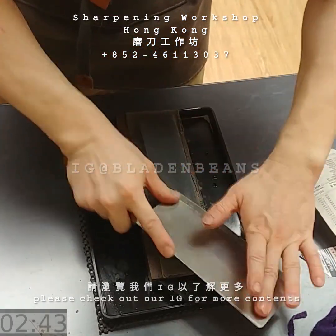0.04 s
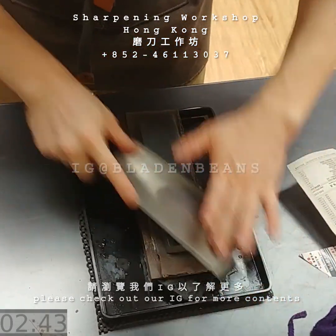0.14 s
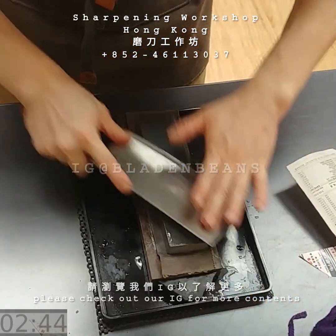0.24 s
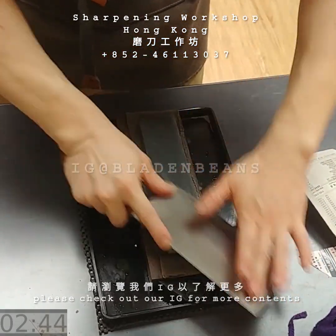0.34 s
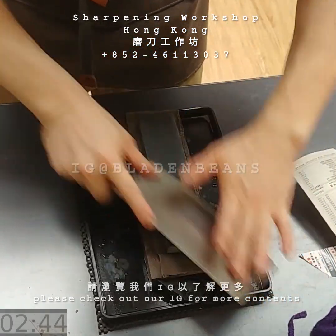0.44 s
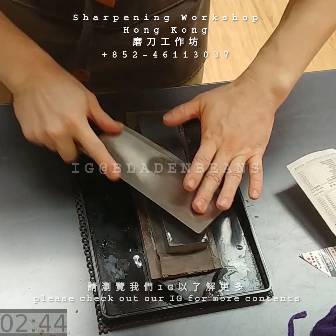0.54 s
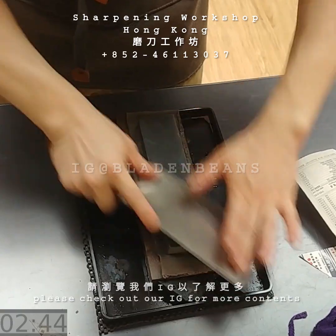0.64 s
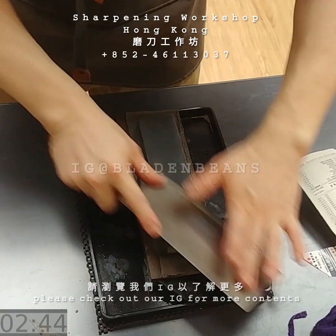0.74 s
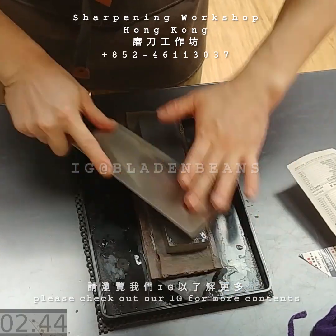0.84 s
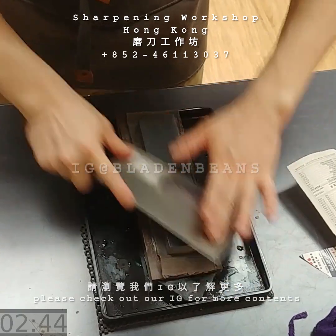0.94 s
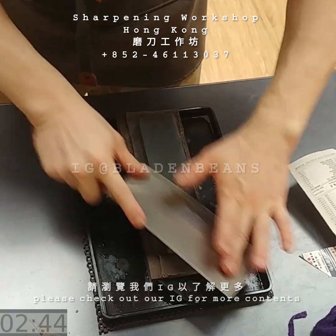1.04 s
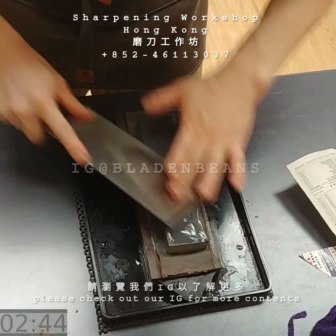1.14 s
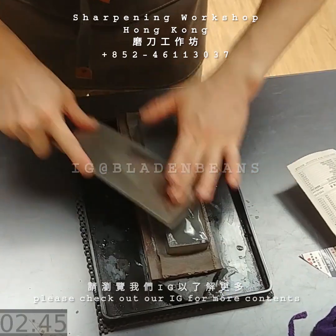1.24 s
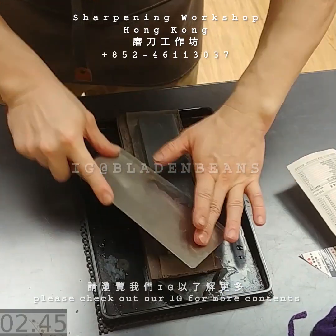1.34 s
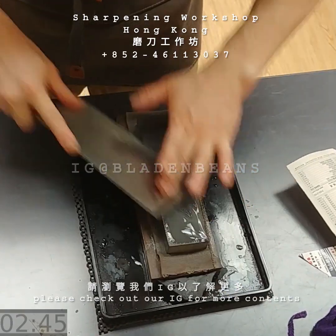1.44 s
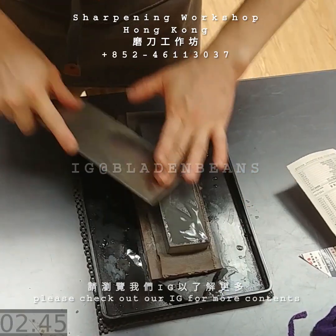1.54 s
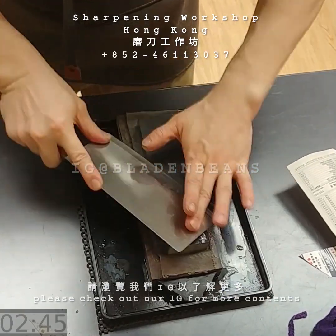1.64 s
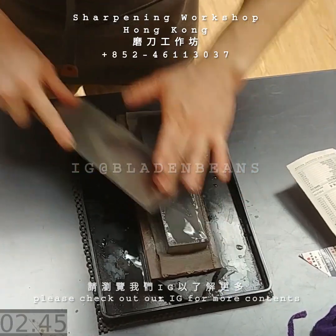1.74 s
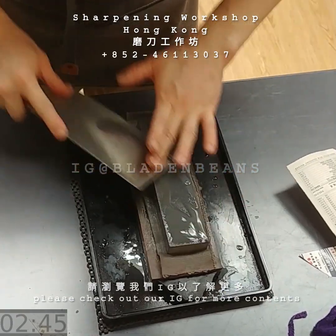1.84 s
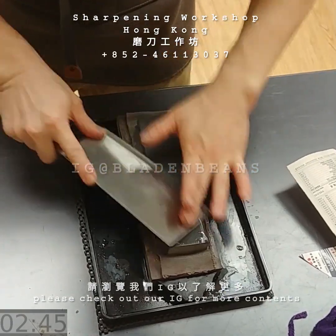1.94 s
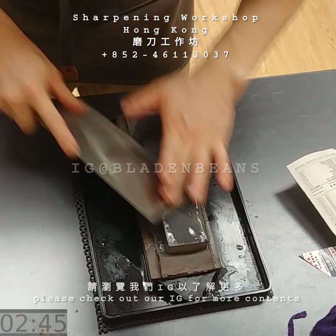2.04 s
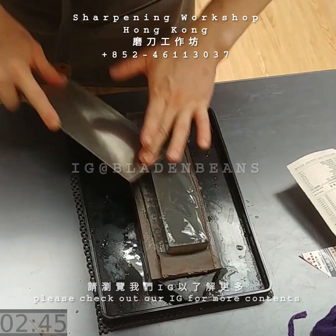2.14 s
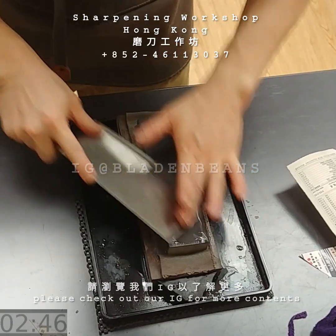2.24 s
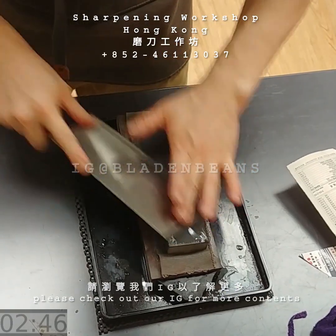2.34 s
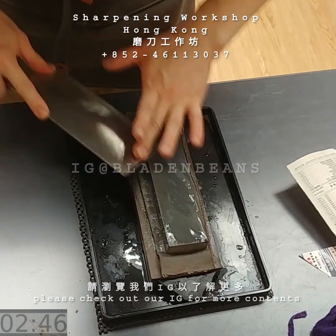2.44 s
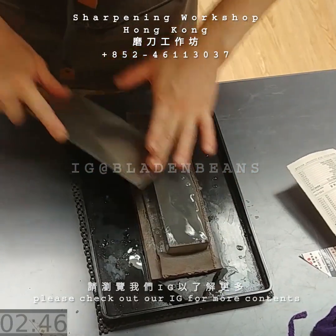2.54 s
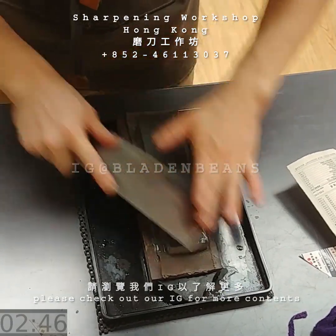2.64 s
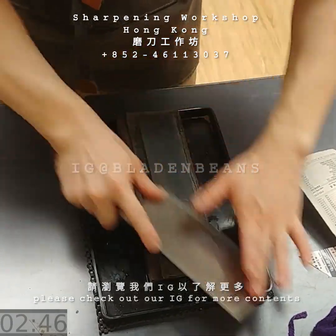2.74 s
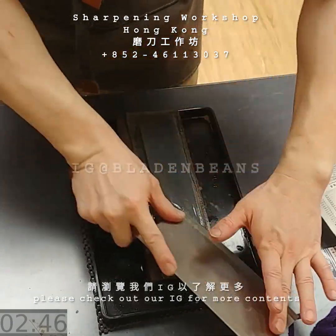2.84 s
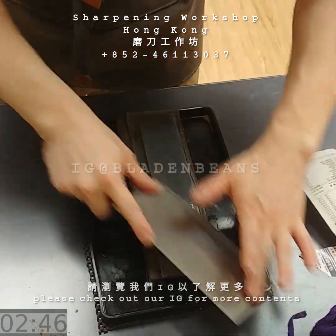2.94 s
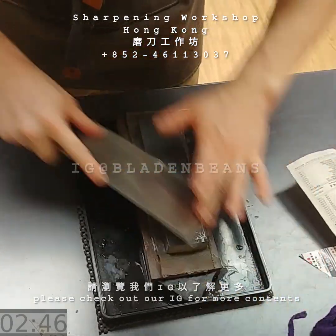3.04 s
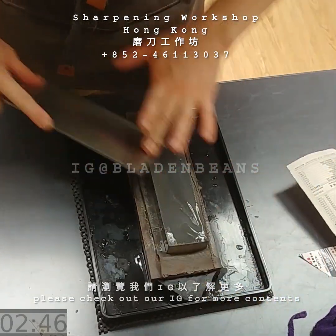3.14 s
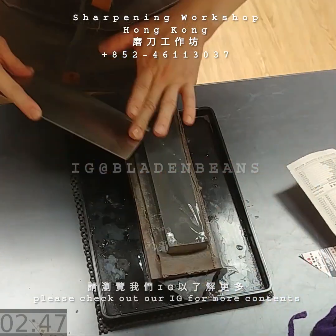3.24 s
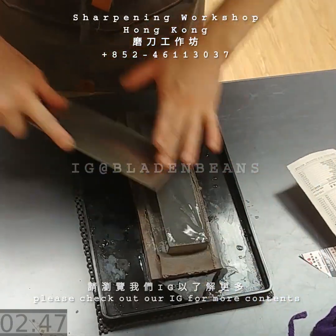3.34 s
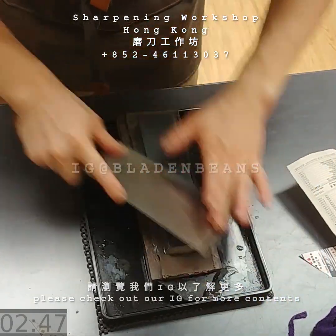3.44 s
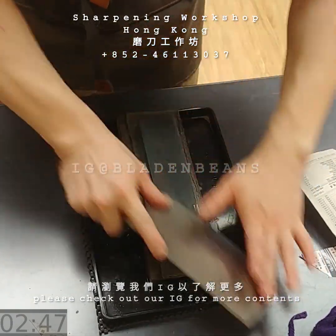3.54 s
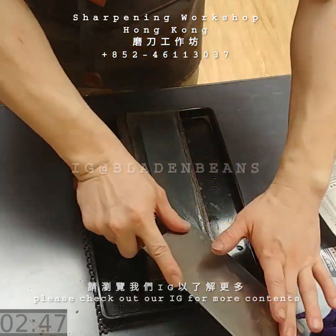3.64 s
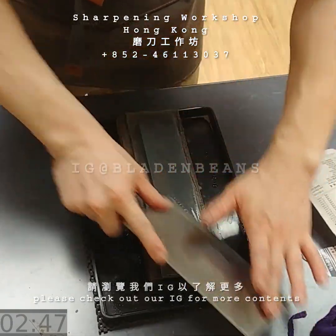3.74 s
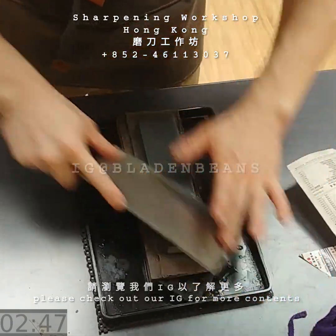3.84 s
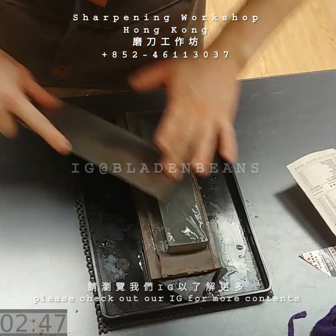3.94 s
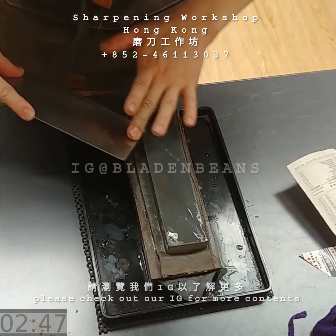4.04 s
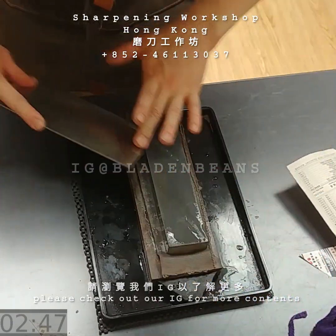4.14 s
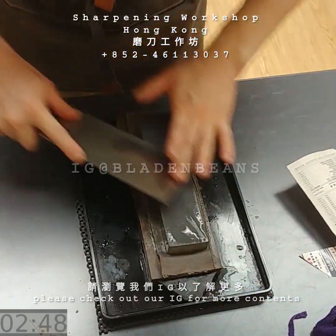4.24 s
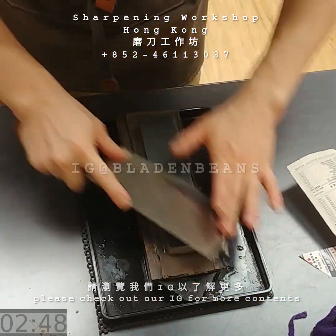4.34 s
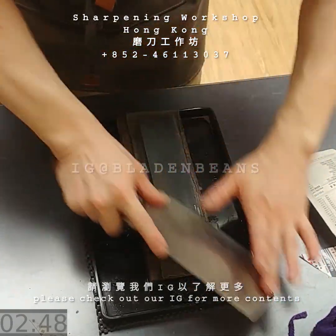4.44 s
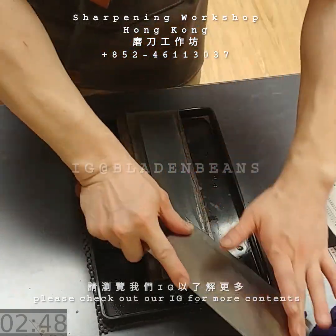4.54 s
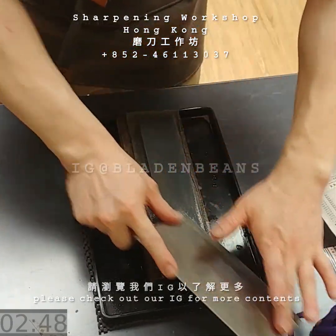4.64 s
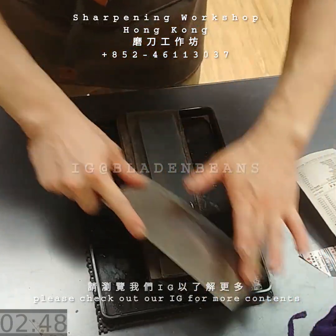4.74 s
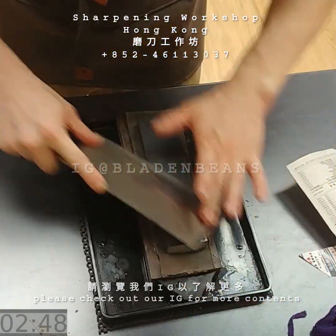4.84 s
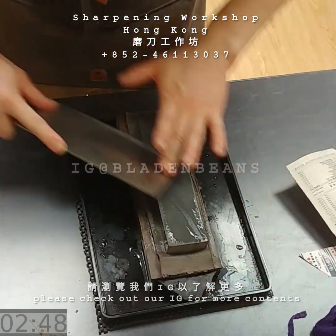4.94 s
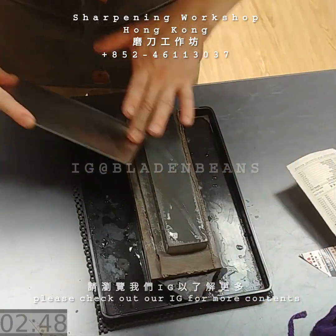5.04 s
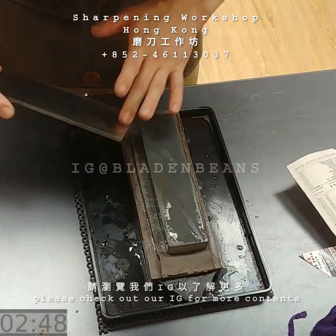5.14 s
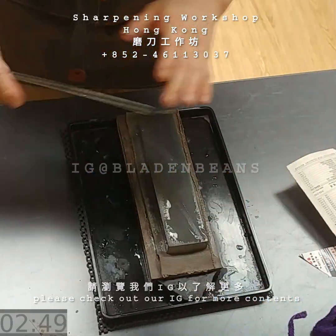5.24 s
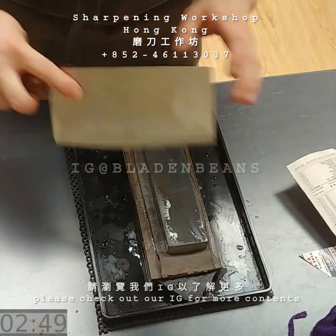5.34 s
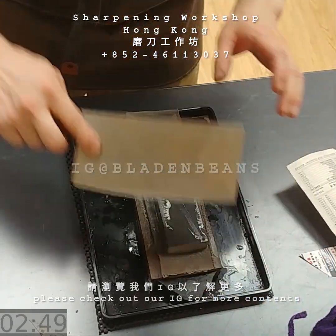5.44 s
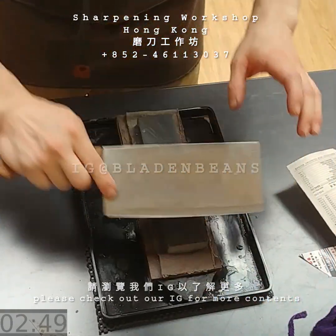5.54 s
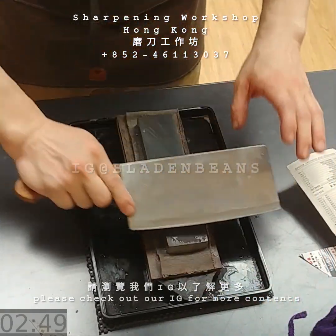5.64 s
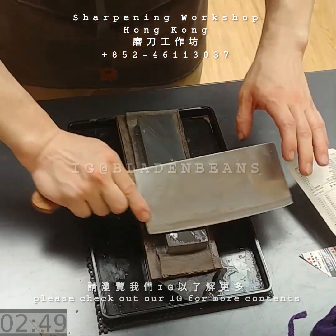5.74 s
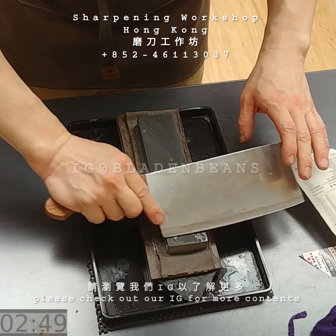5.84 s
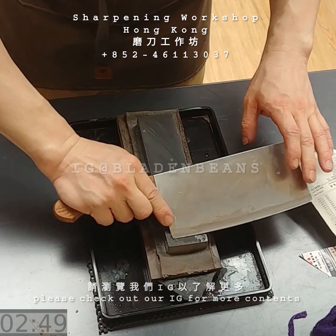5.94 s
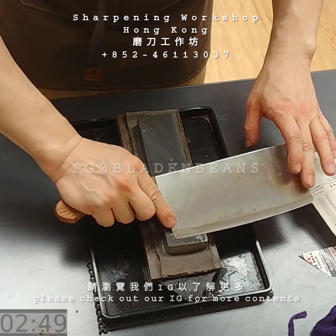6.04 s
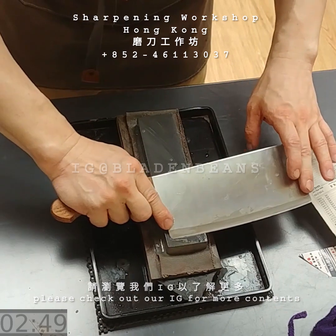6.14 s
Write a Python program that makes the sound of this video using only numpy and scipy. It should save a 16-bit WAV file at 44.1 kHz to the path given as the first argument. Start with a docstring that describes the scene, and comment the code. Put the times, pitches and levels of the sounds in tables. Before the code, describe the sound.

Close to a wet whetstone in a small workshop, a steel cleaver is ground in rapid, uneven strokes, bright and hissy with a slight tray rattle. The strokes grow longer and slower, some ending in a brief metallic ring. The blade lifts off, leaving only a low ventilation rumble, then touches the stone again very faintly. The stereo image leans left.

```python
"""Cleaver on a whetstone

A steel cleaver is ground back and forth on a wet whetstone in a small workshop: fast strokes, then longer ones.
Random scratches of grit, filtered by resonances, hiss along the edge and ring blade, stone and tray.
Narrow noise bands slide down over long pushes, and the blade sings briefly where it overhangs the stone.
The blade lifts off, is silent for a moment and is set down again for two faint strokes.
A ventilation fan of coloured noise and a few unsteady tones rumbles throughout."""
import sys
import numpy as np
from scipy import signal
from scipy.fft import rfft, irfft, next_fast_len
from scipy.io import wavfile
from scipy.ndimage import uniform_filter1d, map_coordinates

SR = 44100
rng = np.random.default_rng(int(sys.argv[2]) if len(sys.argv) > 2 else 0)


def inscribe(sig):
    """Save sig as 16-bit PCM at rate SR to the path in sys.argv[1].

    A 1-D sig is mono; a 2-D sig holds one channel per row.
    Samples are clipped to [-1, 1] before scaling.
    """
    pcm = np.round(np.clip(np.atleast_2d(sig).T, -1, 1) * 32767)
    wavfile.write(sys.argv[1], SR, pcm.astype(np.int16))


N = 273420

# spectrum of fine grit on steel: (frequency [Hz], relative density [dB])
HISS_SPECTRUM = [(2000, -30.5), (5200, -5.5), (6000, 2), (6900, -5), (7900, 0), (9400, -0.5), (10400, -15),
                 (11500, -12), (15500, -8)]


def amp(db):
    """Level to amplitude: 20 dB is a factor of ten."""
    return 10 ** (np.asarray(db) / 20)


def unit(x):
    """Normalisation to rms 1, so that a later gain sets the level."""
    return x / np.sqrt(np.mean(x ** 2) + 1e-20)


def clock():
    """The time of each sample [s]."""
    return np.arange(N) / SR


def along(points, hz):
    """Linear interpolation of (frequency [Hz], value) points on a logarithmic frequency axis."""
    f, value = np.transpose(points)
    return np.interp(np.log(hz + 1), np.log(f + 1), value)


def wobble(rate):
    """Band-limited random motion: a smooth curve through random knots, rate of them a second."""
    knots = rng.standard_normal(int(N * rate / SR) + 4)
    return map_coordinates(knots, [np.arange(N) * rate / SR])


def filtered(x, response):
    """Linear filtering: the spectrum of x times a response given as a function of frequency [Hz]."""
    m = next_fast_len(N + SR // 2)
    hz = np.fft.rfftfreq(m, 1 / SR)
    return irfft(rfft(x, m) * response(hz), m)[..., :N]


def coloured(x, spectrum):
    """Spectral shaping of x by (frequency [Hz], level [dB]) points, at rms 1."""
    return unit(filtered(x, lambda hz: amp(along(spectrum, hz))))


def rung(x, modes):
    """Modal superposition: x drives parallel damped resonators (Hz, width Hz, dB), at rms 1."""
    def response(f):
        return sum(amp(db) * 1j * f * width / (centre * centre - f * f + 1j * f * width)
                   for centre, width, db in modes)
    return unit(filtered(x, response))


def fan():
    """Broadband flow noise, partly coherent between the ears, with tones of wandering phase."""
    # rumble spectrum: (frequency [Hz], relative density [dB])
    air_spectrum = [(25, -47), (50, -13.5), (80, -2), (125, -9.5), (180, -4.5), (220, -13), (290, -12.5),
                    (490, -18), (800, -25), (1500, -35), (3100, -45), (6000, -53.5), (8500, -69),
                    (15000, -56)]
    # fan tones: (frequency [Hz], rms level [dB])
    tones = [(79, -40), (101, -43), (172.4, -47)]
    # correlation of left and right: (frequency [Hz], correlation [-1 to 1])
    alike = [(100, 0.99), (300, 0.99), (1200, 0.29)]

    def mid_and_side(hz):
        # half the angle whose cosine is the correlation
        angle = np.arccos(np.clip(along(alike, hz), -1, 1)) / 2
        return np.array([np.cos(angle), np.sin(angle)])

    air = filtered(rng.standard_normal((2, N)), mid_and_side)
    mid, side = coloured(air, air_spectrum)
    hum = sum(amp(db) * unit(np.sin(2 * np.pi * hz * clock() + 0.8 * wobble(6))) for hz, db in tones)
    return amp(-38.0) * unit(np.array([mid + side, mid - side])) + hum


BRAKE_S, TURN_DB = 0.038, 9  # the blade brakes this long before a reversal and the hiss drops this far
LIFT_S, LIFT_DB = .28, -40.5  # before lifting the hands ease off this long, down to this hiss gain
BITE_GROWS = 1.3  # dB of bite for each dB of hiss
TREMOR_DB, TREMOR_RATE = 1, 35  # unsteadiness of the hands: depth, and random knots a second
SKID_S = 0.016  # half length of a skid
PEEL_S = 0.12  # the edge peels off over this time, until it has left the stone
LEAVE_S, SET_DOWN_S = 5.22, 5.98  # the edge has left the stone, and touches it again


def effort():
    """Friction follows speed and pressure: hiss and bite gains rise, sag and brake; zero without contact."""
    # strokes from one reversal to the next: (start [s], rise [s], hiss gain at full speed [dB],
    # sag over the stroke, negative for a swell [dB], bite gain relative to hiss at full speed [dB])
    strokes = [(-.05, .05, -17.5, 3, -7.5), (0.079, 0.013, -21.5, -2, -6.5), (.21, 0.054, -16, 5, -6.5),
               (0.404, 0.048, -20, -3.5, -7), (0.48, 0.041, -22, -4.5, -3), (.568, 0.042, -16.5, 2, -6),
               (.735, 0.02, -18.5, 0.5, -6.5), (.895, 0.012, -17.5, -1, -7), (1.046, 0.03, -21, -3.5, -7.5),
               (1.222, 0.029, -15.5, 9, -4.5), (1.522, 0.056, -17.5, -0.5, -5), (1.687, 0.028, -19, 0, -14),
               (1.842, .04, -19, -3.5, -3.5), (1.999, 0.037, -16, 7, -9), (2.161, 0.051, -13.5, 10, -6.5),
               (2.503, 0.1, -12.5, 9, -4.5), (2.872, 0.067, -16, 11, -7), (3.25, 0.16, -15, 8, -5),
               (3.674, 0.071, -16, 15.5, -6), (4.105, .16, -17, 7.5, -5.5), (4.601, 0.069, -16, 1.5, -9),
               (5.974, 0.012, -40.5, 2.5, -3), (6.055, 0.058, -33.5, -6, -3)]
    # the edge skids on the slurry and loses its grip for a moment: (middle [s], dip [dB])
    skids = [(1.38, 5.5), (2.222, 6.5), (2.32, 4), (2.61, 9), (3.015, 0.5), (4.803, 2.8)]
    t = clock()
    hiss_db, bite_db = np.zeros((2, N))
    ends = [row[0] for row in strokes[1:]] + [t[-1] + 2 * BRAKE_S]
    turn_db = strokes[0][2] - TURN_DB
    for (start, rise, db, sag_db, press_db), end in zip(strokes, ends):
        brake, end_db = BRAKE_S, db - sag_db - TURN_DB
        if start < LEAVE_S < end:
            end, brake, end_db = LEAVE_S, LIFT_S, LIFT_DB
        now = t >= start  # the next stroke overwrites what follows its own start
        corners = np.maximum.accumulate([start, start + rise, end - brake, end])
        hiss_db[now] = np.interp(t[now], corners, [turn_db, db, db - sag_db, end_db])
        bite_db[now] = db + press_db + BITE_GROWS * (hiss_db[now] - db)
        turn_db = end_db
    tremor_db = TREMOR_DB * wobble(TREMOR_RATE)
    skid_db = sum(db * np.exp(-((t - s) / SKID_S) ** 2) for s, db in skids)
    grip_db = tremor_db - skid_db
    touching = np.clip((LEAVE_S - t) / PEEL_S, 0, 1) ** 2 + (t >= SET_DOWN_S)
    return touching * amp(hiss_db + grip_db), touching * amp(bite_db + grip_db)


def grit(rate, spread_db, judder_db):
    """Shot noise: tiny random scratches, rate a second, clumped by the judder of the edge."""
    hit = rng.random(N) < rate / SR
    sizes = rng.standard_normal(N) * amp(spread_db * rng.standard_normal(N))
    judder = amp(judder_db * (wobble(260) + wobble(60)) / 2)
    return unit(hit * sizes * judder)


def shifting(x, patchy_db):
    """Time-varying coupling: the contact moves along the edge and favours ever different frequencies."""
    z = signal.stft(x, nperseg=512)[2]
    field = uniform_filter1d(rng.standard_normal(z.shape), size=6, axis=0)
    field = uniform_filter1d(field, size=8, axis=1)
    patchy = z * amp(patchy_db * unit(field))
    return unit(signal.istft(patchy, nperseg=512)[1][:N])


def grinding(hiss, bite):
    """Contact excitation: fine grit hisses and rings high modes; pressed coarse grit drives lower ones."""
    # spectrum of coarse grit: (frequency [Hz], relative density [dB])
    bite_spectrum = [(1000, -38.5), (1700, -19.5), (2400, -11), (3200, -3.5), (4400, 0.5), (5500, 1.5),
                     (8500, -36)]
    # lower and higher blade resonances, each: (frequency [Hz], width [Hz], relative level [dB])
    blade_modes = [(2440, 92, -15.5), (3600, 65, 0), (4350, 94, 5.5), (4770, 220, 3.5), (5080, 52, 11.5)]
    bright_modes = [(5970, 330, 14.5), (6450, 65, -2), (7610, 90, -13.5)]
    fine = shifting(grit(rate=18000, spread_db=0.0, judder_db=1.0), patchy_db=2.18)
    coarse = shifting(grit(rate=9000, spread_db=-1.0, judder_db=2.45), patchy_db=2.5)
    high = unit(coloured(fine, HISS_SPECTRUM) + amp(-10) * rung(fine, bright_modes))
    low = unit(coloured(coarse, bite_spectrum) + amp(-17.5) * rung(coarse, blade_modes))
    # a thin sizzle at the very top is strongest in the long sweeps
    sizzle_db = np.interp(clock(), [2.5, 4.2, 4.7], [-14, -3, -12])
    sizzle = amp(sizzle_db) * rung(fine, [(14540, 1600, 0)])
    return amp(-4.5) * hiss * (high + sizzle) + amp(1.23) * bite * low


def stone(hiss, bite):
    """Forced vibration of stone and tray: quick strokes rattle the tray, long ones load the stone."""
    # stone and tray resonances, each: (frequency [Hz], width [Hz], relative level [dB])
    stone_modes = [(835, 132, -7.5), (1046, 75, 1), (1470, 2000, -11), (2172, 73, 1.5)]
    tray_modes = [(312.2, 19, 10), (378, 31, 3), (455, 110, 0.5)]
    body = rung(shifting(grit(rate=3300, spread_db=2.0, judder_db=-0.5), patchy_db=4.5), stone_modes)
    tray = rung(rng.standard_normal(N), tray_modes)
    load_db = np.interp(clock(), [1.5, 2.6], [-29.5, -27.5])
    shake_db = np.interp(clock(), [.9, 1.4], [-29.5, -37])
    # powers below one: both vary less than the scraping itself
    return amp(load_db) * bite ** 0.57 * body + amp(shake_db) * np.sqrt(hiss) * tray


def bench(hiss):
    """Low-frequency structural resonance: a soft rumble during contact, booms as the arms lean in."""
    # bench resonances: (frequency [Hz], width [Hz], relative level [dB])
    bench_modes = [(79.5, 41, -1.5), (108, 22, -4)]
    # heavy strokes: (middle [s], level [dB])
    booms = [(.21, -30), (1.76, -30), (3.4, -29.5), (3.86, -35), (4.3, -33.5), (5.02, -34)]
    swell = sum(amp(db) * np.exp(-((clock() - s) / 0.067) ** 2) for s, db in booms)
    # two passes steepen the resonances
    rumble = rung(rung(rng.standard_normal(N) * (hiss > 0), bench_modes), bench_modes)
    boom = unit(np.sin(2 * np.pi * bench_modes[0][0] * clock() + 1.75 * wobble(18)))
    return amp(-39) * rumble + swell * boom


def catches():
    """Impulsive friction: decaying noise bursts where the edge lands or digs in."""
    # catches on the stone: (onset [s], relative peak level [dB])
    catch_times = [(.426, -12), (.576, -6), (1.858, -9), (2.188, -9), (4.622, -11), (5.983, -27)]
    t = clock()
    # each falls 60 dB in 0.04 s
    burst = sum(amp(db - 60 * np.abs(t - s) / .04) * (t >= s) for s, db in catch_times)
    return amp(-12) * burst * coloured(rng.standard_normal(N), HISS_SPECTRUM)


def bending():
    """Bending resonance falls with free length: a narrow noise band slides as more blade hangs free."""
    # long pushes: (start [s], end [s], start frequency [Hz], end frequency [Hz], level [dB])
    pushes = [(2.57, 2.78, 1050, 728, -39), (3.37, 3.62, 1073, 840, -50), (4.24, 4.491, 1053, 752, -48)]
    t, out = clock(), np.zeros(N)
    for start, end, from_hz, to_hz, db in pushes:
        phase = 2 * np.pi * np.cumsum(np.interp(t, [start, end], [from_hz, to_hz])) / SR
        progress = np.clip((t - start) / (end - start), 0, 1)
        swell = np.sqrt(np.abs(np.sin(np.pi * progress)))
        # random quadrature amplitudes spread the tone into a band
        band = unit(wobble(110) * np.sin(phase) + wobble(110) * np.cos(phase))
        out += amp(db) * swell * band
    return out


def singing():
    """Lightly damped vibration: at the far end of a stroke the free steel rings on a few sharp modes."""
    # moments of singing: (middle [s], half length [s], level [dB])
    sings = [(2.822, .04, -24.5), (3.634, 0.06, -31.5), (4.53, 0.046, -34.5), (4.635, 0.019, -31.5)]
    # overhanging blade resonances: (frequency [Hz], width [Hz], relative level [dB])
    overhang_modes = [(2380, 55, -18), (3131, 11.4, 9.5), (4184, 61.6, -12)]
    swell = sum(amp(db) * np.exp(-((clock() - s) / half) ** 2) for s, half, db in sings)
    return swell * rung(rng.standard_normal(N), overhang_modes)


def lift_off():
    """Release of contact: the edge scuffs dully over the stone's corner and the free blade decays."""
    t = clock()
    scuff = amp(-41) * np.exp(-((t - 5.095) / 0.02) ** 2) * rung(rng.standard_normal(N), [(1350, 820, 0)])
    # falls 60 dB in 0.4 s
    decay = amp(-54.0 - 60 * np.abs(t - 5.12) / 0.4) * (t > 5.12)
    ring = decay * rung(rng.standard_normal(N), [(7960, 500, 0)])
    return scuff + ring


def reflected(x, decay, count=40):
    """Convolution with decaying noise of unit energy, whose pattern changes as blade and hands move."""
    noise = rng.standard_normal((count, 2, SR // 3))
    hz, t, z = signal.stft(noise, SR, nperseg=128)
    decay_db = -60 * t / along(decay, hz)[:, None]
    tails = signal.istft(z * amp(decay_db), SR, nperseg=128)[1]
    tails = tails / np.linalg.norm(tails, axis=-1, keepdims=True)
    hop = N // (count - 2)
    padded, out = np.pad(x, (hop, SR)), np.zeros((2, N + 2 * SR))
    fade = np.sqrt(np.hanning(2 * hop))  # overlapping fades add up to constant power
    for k, tail in enumerate(tails):
        piece = fade * padded[k * hop:(k + 2) * hop]
        echo = signal.fftconvolve(piece[None], tail, axes=1)
        out[:, k * hop:k * hop + echo.shape[1]] += echo
    return out[:, hop:hop + N]


def room(x):
    """Direct and diffuse fields: much of the sound scatters off nearby things, with a short wall tail."""
    # reflections off bench, tray and hands, and off the walls, each: (frequency [Hz], decay time T60 [s])
    nearby = [(300, 0.063), (15000, 0.036)]
    walls = [(1000, 0.48), (15000, 0.071)]
    # scattered part of the energy: (frequency [Hz], share [0 to 1])
    diffuse = [(300, .01), (550, 0.22), (1200, 0.81), (15000, 0.47)]
    share = lambda hz: np.clip(along(diffuse, hz), 0, 1)
    echoes = reflected(x, nearby) + amp(-7.5) * reflected(x, walls)
    direct = filtered(x, lambda hz: np.sqrt(1 - share(hz)))
    return direct + filtered(echoes, lambda hz: np.sqrt(share(hz)))


def scene():
    """Superposition of knife, stone, bench and fan in the room."""
    hiss, bite = effort()
    knife = grinding(hiss, bite) + stone(hiss, bite) + bending() + singing() + catches() + lift_off()
    return room(knife) + bench(hiss) + fan()


def record(dry):
    """Transducer response: shared treble resonance, louder left, soft saturation and limited bandwidth."""
    # treble resonance of what both microphones share: (frequency [Hz], gain [dB])
    ports = [(5900, -0.5), (6500, 5.5), (7200, 11), (7850, 15), (8700, 7), (9500, -0.5)]
    # left over right: (frequency [Hz], level difference [dB])
    balance = [(100, 4.06), (8500, 4.74), (13000, 1.3)]
    peak_top, top_hz = .85, 15800  # ceiling of the rounded peaks (full scale 1), upper band limit [Hz]
    common = dry.mean(axis=0)
    picked_up = dry - common + filtered(common, lambda hz: amp(along(ports, hz)))
    pair = filtered(picked_up, lambda hz: amp(np.outer([1, -1], along(balance, hz)) / 2))
    rounded = pair / (1 + np.abs(pair / peak_top) ** 6) ** (1 / 6)
    return filtered(rounded, lambda hz: np.clip((top_hz - hz) / 200 + .5, 0, 1))


dry = scene()
out = record(dry)
inscribe(out)
```